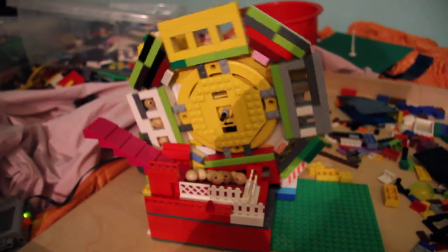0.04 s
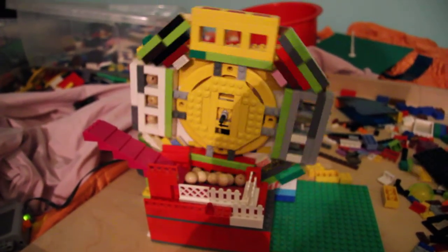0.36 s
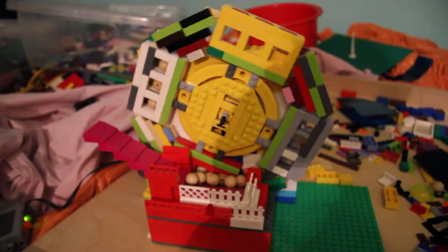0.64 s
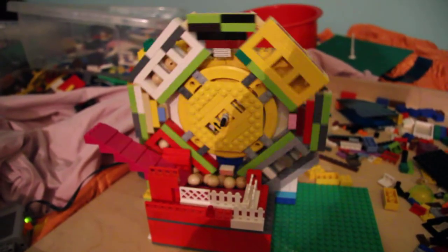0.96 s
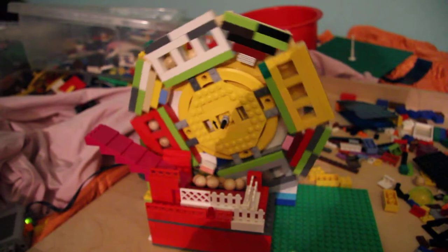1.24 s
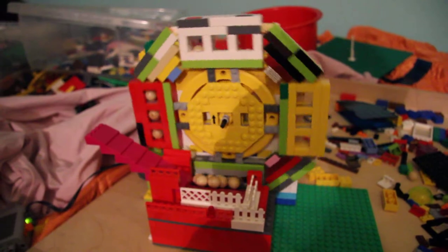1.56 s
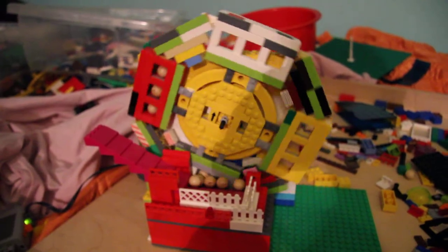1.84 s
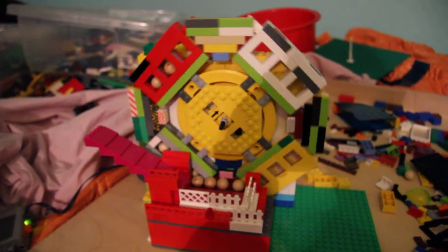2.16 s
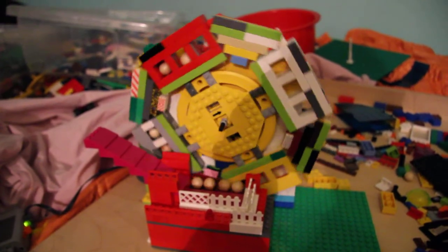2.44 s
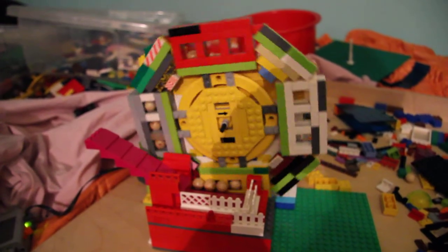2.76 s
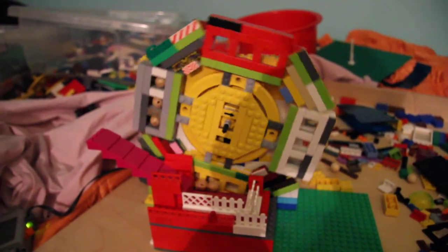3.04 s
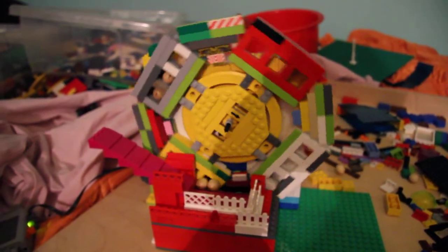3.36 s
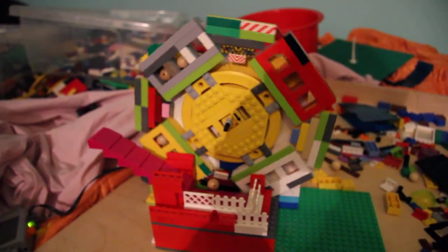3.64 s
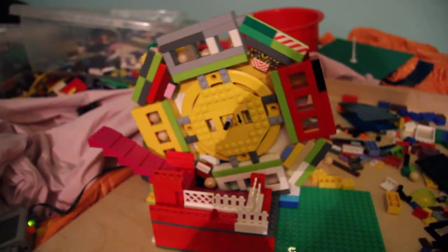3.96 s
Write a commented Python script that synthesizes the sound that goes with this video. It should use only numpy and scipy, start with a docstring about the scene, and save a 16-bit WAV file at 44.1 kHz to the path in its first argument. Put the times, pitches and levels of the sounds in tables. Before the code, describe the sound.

A plastic toy brick wheel clatters throughout as small balls clack and roll inside. Hard snaps overload the close microphone at about 0.2 and 0.6 seconds, twice just after 2, then at 2.7 and 3.2. A ball bounces around 1.3 seconds, and the rattling thickens from 1.5 to 1.9, with hollow knocks and light thuds. A faint motor whirr and thin, high whine continue underneath in a small, lively room.

```python
"""A wheel of plastic toy bricks snaps and clatters as a motor turns it on a table in a small, lively room.
Six hard snaps of its frame overload the close microphone. Small balls clack against the bricks, roll,
bounce in a pocket and knock on a hollow part, and the housing thuds: each impact excites the damped
modes of the part it strikes. The motor whirrs faintly underneath, with a thin electrical whine above."""
import sys
import numpy as np
from scipy import signal
from scipy.fft import rfft, irfft
from scipy.io import wavfile

SR = 44100
rng = np.random.default_rng(int(sys.argv[2]) if len(sys.argv) > 2 else 0)


def store_wav(level_fs):
    """Save 16-bit WAV to argv[1]."""
    pcm = np.round(np.clip(np.atleast_2d(level_fs), -1, 1) * 32767)
    wavfile.write(sys.argv[1], SR, pcm.T.astype(np.int16))


N = 176400
AGE = np.arange(SR // 4) / SR  # seconds since an impact

# Snaps of the frame. Each row: start in seconds, level in dB.
SNAPS = [(0.1974, -4), (0.599, -2), (2.029, -4.5), (2.114, -6.5), (2.7453, -4), (3.2075, -4)]
# Balls clacking on bricks, plus one bright early echo of a snap at 2.0416 s.
# Each row: start in seconds, level in dB, ring frequency in Hz, relative thump in dB,
# relative tick in dB. The three offsets below add to these levels.
CLACKS = [(0.1197, -24.5, 3480, -27, -7), (0.2946, -22.5, 1990, 0, -7), (0.303, -21, 4150, -2, -8.5),
          (0.3517, -24.5, 1580, -25, -6), (0.3704, -18, 2430, 7, -2), (0.3755, -18, 3090, -5, 5.5),
          (0.4276, -26, 1606, 5, 7.5), (0.4684, -21.5, 2140, -19, 3), (0.5335, -24, 2850, -6, -14),
          (0.5513, -23, 3300, -7, -8), (0.564, -22, 2060, 3, -11), (0.7383, -32, 2230, 6, -20),
          (0.7597, -31, 2760, 5, -19), (0.8056, -28.5, 2760, 4, -5), (0.952, -25, 4480, -28, -8),
          (0.9573, -21.5, 4170, -23, -26), (0.964, -25, 3250, -21, -21), (0.9788, -24, 2790, -21, -20),
          (0.9824, -18.5, 2800, -34, -7.5), (1.0233, -29, 2750, -4, -8), (1.043, -22.5, 3300, -3.5, -22),
          (1.0627, -22.5, 2760, -2, -6), (1.1045, -29, 3280, -1.5, -24), (1.18, -31.5, 3200, 4.5, -7.5),
          (1.4072, -24.5, 2230, -5.5, -23), (1.5291, -20, 2130, -5, -4.5), (1.5361, -21.5, 3300, 2.5, -13),
          (1.588, -21, 3460, -22, -3.5), (1.5995, -35, 2200, -9, -10), (1.611, -29, 2900, -2, -16),
          (1.629, -26, 2200, -10, -12), (1.6356, -19.5, 3930, -22, -0.5), (1.663, -32, 2530, -13, -9),
          (1.672, -19.5, 2180, -23, -13), (1.6826, -18.5, 3460, -33, -6), (1.7089, -25.5, 4640, 1, -1),
          (1.718, -20, 2600, -20, -31), (1.7357, -18, 2320, -22, -3.5), (1.7712, -15, 2200, -13, -5),
          (1.8357, -23, 3880, -23, -3.5), (1.8597, -23, 3170, -17, -23), (1.9718, -29, 2980, -1, -18),
          (2.0146, -30, 4220, 5, -6), (2.0416, -32, 6700, 15, 14.5), (2.2313, -22, 3100, -13, -8),
          (2.2503, -17.5, 1865, -6, -3.5), (2.2665, -18, 1830, 0, -8), (2.3077, -23.5, 1980, -12, -24),
          (2.3377, -27.5, 2070, -3, -10), (2.3557, -20.5, 2340, 1.5, 3), (2.416, -26, 4070, 3.5, -13),
          (2.4349, -29.5, 2560, 0, -3), (2.4753, -28.5, 2400, -1, -21), (2.483, -17.5, 1584, -21, -3.5),
          (2.5412, -30, 5220, -13, 2), (2.5951, -29, 2220, -2, -10), (2.9353, -19.5, 3700, -13, -7.5),
          (2.9512, -18.5, 1320, -24, -14), (2.9736, -18, 2480, -22, -8), (3.0252, -24, 2980, -12, -10),
          (3.087, -21.5, 3170, -25, -3), (3.1048, -21, 5040, -21, -11), (3.1184, -28, 4470, -21, -24),
          (3.1564, -27.5, 1920, -1, -8), (3.428, -16, 3560, -2, -3), (3.4825, -18.5, 2320, -23, -3.5),
          (3.5703, -18.5, 2600, -18, -6), (3.6087, -19.5, 5220, 3, 2.5), (3.6215, -27, 5760, -25, -4),
          (3.6289, -19, 3820, -32, -7), (3.6687, -20, 2280, -7, -5.5), (3.6967, -28, 2600, -4, -14),
          (3.7044, -27.5, 4860, -18, -10), (3.7243, -28, 3900, 0.5, -23), (3.8937, -32.5, 2230, -18, -26)]
CLACK_DB, THUMP_DB, TICK_DB = 2.5, -10.5, -8
# Knocks on the hollow part, bounces in the pocket. Each row: start in seconds, level in dB,
# relative tick in dB.
KNOCKS = [(0.1543, -8.5, -18.5), (1.4679, -23.5, -16), (1.487, -23, -22), (1.5781, -16.5, -13.5),
          (1.6451, -12, -17), (2.3932, -17.5, -12.5), (2.788, -18.5, -18), (2.8285, -18.5, -11.5)]
BOUNCES = [(1.2311, -14.5, -11.5), (1.2486, -14, -20), (1.285, -17.5, -14), (1.3191, -23, -13.5),
           (1.338, -28.5, -21)]
# Jolts of the wheel against its housing. Each row: start in seconds, level in dB, relative boom in dB,
# relative hiss in dB. The offset below adds to the hiss.
JOLTS = [(0.029, -21, -2.5, -11), (0.8303, -11.5, -14, -17), (1.8026, -16.5, -5, -11),
         (1.8904, -14.5, -5.5, -9), (2.3494, -15, -9, -12), (2.512, -19.5, -5, -4), (2.9853, -18, -7, -8),
         (3.8143, -17, -6.5, -9)]
HISS_DB = -13
# Pings of a small stiff piece. Each row: start in seconds, level in dB, centre frequency in Hz.
PINGS = [(0.43, -28.5, 8560), (0.476, -29, 8500), (2.35, -26.5, 9850), (3.608, -26, 5770)]
# Envelope of the rolling balls. Each row: time in seconds, level in dB.
ROLLING_LEVEL = [(0, -36), (.14, -39.5), (.33, -29.5), (.5, -39), (.7, -38.5), (.92, -43), (.97, -34),
                 (1.15, -53), (1.48, -37), (1.55, -29.5), (1.68, -25), (1.8, -29), (1.96, -36.5),
                 (2.35, -37.5), (2.52, -36.5), (2.68, -46.5), (2.84, -29), (3.0, -35), (3.2, -36),
                 (3.38, -46), (3.46, -26.5), (3.54, -45), (3.66, -52), (3.8, -44.5), (3.95, -47.5)]

# Normal modes of each part. Each row: frequency in Hz, relative level in dB, 60 dB decay time in seconds.
FRAME_MODES = [(730, -3, 0.011), (1045, -8, 0.0061), (1630, -1, 0.013), (2210, 4.5, 0.0073),
               (3025, 9.5, 0.0026), (4073, -1, 0.0086), (4740, -3, 0.011), (5440, -13, 0.0079),
               (6170, 2.5, 0.0024), (7540, -3, 0.0018)]
BRICK_MODES = [(1320, -5, 0.02), (1514, 1.5, 0.0094), (1790, 0, 0.0092), (2205, 5, 0.0061),
               (2187, -9, 0.036), (2670, -1.5, 0.018), (3150, 9, 0.0035), (3846, -3, 0.021),
               (4400, -5, 0.012), (5200, -3, 0.0063)]
BASE_MODES = [(105, -35.5, 0.073), (210, -12.5, 0.072), (223, -21, 0.067), (329, -5.5, 0.037),
              (423, -20, 0.092), (565, -12, 0.052), (707, 0, 0.029), (778, 2.5, 0.018), (1130, 4, 0.01)]
HOLLOW_MODES = [(1540, -16, 0.04), (1910, -18.5, 0.15), (2232, 2.5, 0.022), (2170, -31, 0.2),
                (2650, -4, 0.0071)]
POCKET_MODES = [(1240, -7, 0.035), (1293, 5, 0.033), (1426, -2, 0.058), (1640, 4.5, 0.025),
                (2170, 1.5, 0.018), (2710, -4, 0.03), (3250, 6, 0.013), (3860, 0.5, 0.038),
                (5620, 2, 0.0087)]
HOUSING_MODES = [(218, -8.5, 0.043), (320, -5.5, 0.027), (717, 3.5, 0.02)]
BRICK_BAND_HZ = (630, 8600)

# Tones of the motor. Each row: frequency in Hz, level in dB.
MOTOR_TONES = [(99, -55), (120, -61), (199, -56.5), (226, -57.5)]
# Spectrum of the gear noise. Each row: frequency in Hz, relative spectral density in dB.
GEAR_SPECTRUM = [(80, 7), (400, 4.5), (2000, 9.5), (4000, -29), (12000, -48)]
# Reverberation time of the room. Each row: frequency in Hz, 60 dB decay time in seconds.
ROOM_T60 = [(150, 0.72), (500, 0.41), (2000, 0.57), (5500, 0.4), (9000, 0.32), (15000, 0.68)]
# Colour of the reverberation. Each row: frequency in Hz, relative level in dB.
ROOM_COLOUR = [(60, -25), (200, 6), (500, -2), (1000, -1), (2000, 0.5), (5000, 0.5), (8000, 3.5),
               (12000, 1), (16000, -8.5)]
# Early reflections. Each row: delay in seconds, gain in dB.
REFLECTIONS = [(0.0046, -17), (0.012, -16), (0.0139, -15.5)]


def snaps():
    """Sudden release: the frame catches, snaps free and rings, with little bass."""
    out = np.zeros(N)
    for start, db in SNAPS:
        joint_chatter = from_db(-2) * tick(decay_s=0.00066, low_hz=640, high_hz=7070)
        frame = strike(FRAME_MODES, spread_db=2)
        crack = from_db(-23) * tick(decay_s=0.00027)
        add(out, start, from_db(db) * (frame + joint_chatter + crack))
    return signal.sosfilt(signal.butter(3, 560, "high", fs=SR, output="sos"), out)


def clacks():
    """Inelastic impact: a ball rings a part and its bricks, thumps the base and rebounds twice, weaker.
    One bright clack stands for an early echo of a snap."""
    out = np.zeros(N)
    ring_cycles, rebound_s, rebound_db = 53, 0.005, -5.5
    for start, db, hz, thump_db, tick_db in CLACKS:
        part = from_db(-1.5) * unit_onset(ring(hz, t60=ring_cycles / hz))
        body = unit_onset(brick_knock(spread_db=4) + part)
        thump = from_db(thump_db + THUMP_DB) * strike(BASE_MODES, spread_db=3)
        tick_gain = from_db(tick_db + TICK_DB)
        add(out, start, from_db(db + CLACK_DB) * (body + thump + tick_gain * tick()))
        lags = np.cumsum(rebound_s * rng.uniform(0.5, 1, size=2))
        for k, lag in enumerate(lags, 1):
            rebound = brick_knock(spread_db=-0.5) + tick_gain * tick()
            add(out, start + lag, from_db(db + k * rebound_db) * rebound)
    return out


def brick_knock(spread_db):
    """Band-limited radiation: small bricks give little bass, and a soft contact little far treble."""
    return unit_onset(band(strike(BRICK_MODES, spread_db), *BRICK_BAND_HZ))


def ringing_hits(hits, modes, bricks_db):
    """Resonance: a ball excites the same modes of one part at each hit and shakes the bricks round it."""
    out = np.zeros(N)
    for start, db, tick_db in hits:
        part = strike(modes, spread_db=1.5)
        bricks = from_db(bricks_db) * strike(BRICK_MODES, spread_db=5.5)
        body = band(unit_onset(part + bricks), *BRICK_BAND_HZ)
        add(out, start, from_db(db) * (body + from_db(tick_db) * tick()))
    return out


def jolts():
    """Impact excitation: the hollow housing booms under a brick knock.
    Each jolt ends in a brief, bright hiss, like a tick echoing round the room."""
    knocks, hisses = np.zeros((2, N))
    for start, db, boom_db, hiss_db in JOLTS:
        bricks = brick_knock(spread_db=3.5)
        boom = from_db(boom_db) * strike(HOUSING_MODES, spread_db=1.5)
        add(knocks, start, from_db(db) * (bricks + boom + from_db(-10.5) * tick()))
        hiss = tick(decay_s=0.023, low_hz=7800, high_hz=12900)
        add(hisses, start, from_db(db + hiss_db + HISS_DB) * hiss)
    return knocks + room(knocks) + hisses


def pings():
    """Beating: a small stiff piece rings in four closely spaced modes."""
    out = np.zeros(N)
    detune, t60 = 0.0165, 0.059
    for start, db, hz in PINGS:
        cluster = [(hz * (1 + detune * k), 0, t60) for k in np.linspace(-1, 1, 4)]
        add(out, start, from_db(db) * strike(cluster, spread_db=3))
    return out


def rolling():
    """Shot noise: balls bump over studs and seams, and the random impulses drive the bricks and base."""
    contacts_per_s, spread_db = 1100, 4.5
    contacts = rng.random(N) < contacts_per_s / SR
    impulses = contacts * from_db(spread_db * np.minimum(rng.exponential(1, N), 2.5))

    def shaken(responses):
        """Convolution: every contact excites each impulse response with a random weight."""
        return unit_rms(sum(signal.oaconvolve(impulses * rng.uniform(-0.95, 1, N), response)[:N]
                            for response in responses))

    bricks = shaken([from_db(db) * ring(hz, t60) for hz, db, t60 in BRICK_MODES])
    base = shaken([from_db(db) * ring(hz, t60) for hz, db, t60 in BASE_MODES])
    ticks = from_db(-23) * shaken([tick() for _ in range(3)])
    rumble = from_db(-10) * unit_rms(band(base, low_hz=121, high_hz=630))
    envelope = from_db(np.interp(np.arange(N) / SR, *np.transpose(ROLLING_LEVEL)))
    return envelope * (band(bricks, *BRICK_BAND_HZ) + rumble + ticks)


def motor():
    """Frequency modulation: the motor's low tones waver with the load, over soft gear noise."""
    wobble = np.interp(np.arange(N), np.linspace(0, N, 60), rng.standard_normal(60))
    phase_per_hz = 2 * np.pi * np.cumsum(1 + 0.0067 * wobble) / SR
    hum = sum(np.sqrt(2) * from_db(db) * np.sin(hz * phase_per_hz) for hz, db in MOTOR_TONES)
    gear_colour = from_db(at_hz(GEAR_SPECTRUM, np.fft.rfftfreq(N, 1 / SR)))
    gears = irfft(rfft(rng.standard_normal(N)) * gear_colour, N)
    return hum + from_db(-41.5) * unit_rms(gears)


def whine(hz=15620, rms_db=-57.5):
    """Simple harmonic motion: a faint electrical whine at one steady frequency."""
    return np.sqrt(2) * from_db(rms_db) * np.sin(2 * np.pi * hz * np.arange(N) / SR)


def room(x):
    """Reverberation: early reflections and a diffuse tail that decays exponentially in each band."""
    t = np.arange(SR * 3 // 4) / SR
    edges_hz = np.geomspace(60, 18000, 13)
    build_s, tail_db = 0.001, -5
    tail = 0
    for low, high in zip(edges_hz, edges_hz[1:]):
        hz = np.sqrt(low * high)
        decay = np.exp(-np.log(1000) * t / at_hz(ROOM_T60, hz))
        tail += from_db(at_hz(ROOM_COLOUR, hz)) * band(rng.standard_normal(len(t)), low, high) * decay
    tail *= 1 - np.exp(-t / build_s)
    tail *= from_db(tail_db) / np.sqrt(2 * np.sum(tail ** 2))  # relative to half the direct energy
    for delay, db in REFLECTIONS:
        tail[int(delay * SR)] += from_db(db)
    return signal.fftconvolve(x, tail)[:N]


def strike(modes, spread_db, travel_s=0.000904):
    """Modal superposition: a blow starts each mode with its own strength, sign and travel time."""
    gains = from_db(spread_db * rng.standard_normal(len(modes))) * rng.choice([-1, 1], len(modes))
    return unit_onset(sum(gain * from_db(db) * ring(hz, t60, travel_s * rng.random())
                          for gain, (hz, db, t60) in zip(gains, modes)))


def ring(hz, t60, delay_s=0):
    """Damped oscillation: a sine that falls 60 dB in t60 seconds."""
    age = np.maximum(AGE - delay_s, 0)
    return np.sin(2 * np.pi * hz * age) * np.exp(-np.log(1000) * age / t60)


def tick(decay_s=0.0018, low_hz=4170, high_hz=7840):
    """Broadband transient: a hard contact gives a brief, decaying burst of noise."""
    burst = rng.standard_normal(len(AGE)) * np.exp(-AGE / decay_s)
    return unit_onset(band(burst, low_hz, high_hz))


def from_db(db):
    """Convert decibels to an amplitude ratio."""
    return 10 ** (np.asarray(db) / 20)


def unit_rms(x):
    """Normalise to rms 1."""
    return x / np.sqrt(np.mean(x ** 2) + 1e-20)


def unit_onset(x):
    """Normalise a hit to rms 1 over its first 6 ms."""
    return x / np.sqrt(np.mean(x[:265] ** 2) + 1e-20)


def at_hz(points, hz):
    """Interpolate a table on a log-frequency axis."""
    frequencies, values = np.transpose(points)
    return np.interp(np.log(hz + 1e-3), np.log(frequencies), values)


def band(x, low_hz, high_hz):
    """Apply a Butterworth band-pass."""
    return signal.sosfilt(signal.butter(2, [low_hz, high_hz], "band", fs=SR, output="sos"), x)


def add(out, start, x):
    """Superpose x on out from start, in seconds."""
    i = int(start * SR)
    out[i:i + len(x)] += x[:max(N - i, 0)]


def scene():
    """Superposition of direct and reflected sound; the frame radiates into the room from three sides."""
    snap_reverb = from_db(-9.5) * sum(room(band(snaps(), low_hz=300, high_hz=7560)) for _ in range(3))
    balls = [clacks() + pings(),
             rolling(),
             ringing_hits(KNOCKS, HOLLOW_MODES, bricks_db=-15)
             + ringing_hits(BOUNCES, POCKET_MODES, bricks_db=-1.5)]
    frame = snaps() + snap_reverb
    clatter = sum(layer + room(layer) for layer in balls)
    return (frame + clatter + jolts() + motor() + whine())[None]


def record(dry):
    """Saturation: the band-limited microphone clips the snaps flat, and a low-pass cuts the top."""
    thin = signal.sosfilt(signal.butter(4, [104.4, 15300], "band", fs=SR, output="sos"), dry)
    clipped = np.clip(thin, -1, 1)
    return signal.sosfilt(signal.cheby2(12, 60, 17500, fs=SR, output="sos"), clipped)


dry = scene()
out = record(dry)
store_wav(out)
```